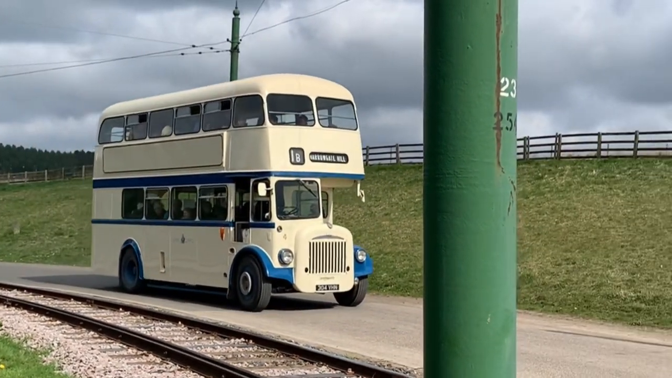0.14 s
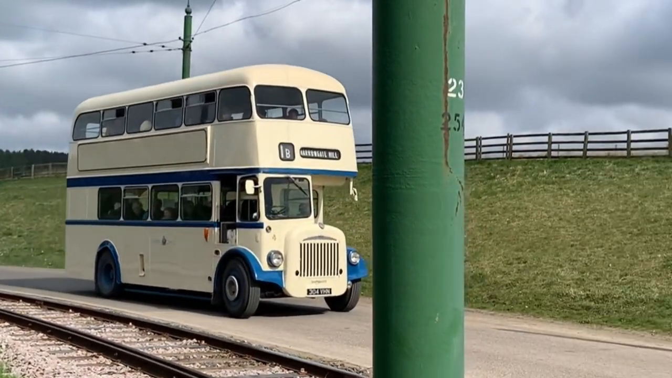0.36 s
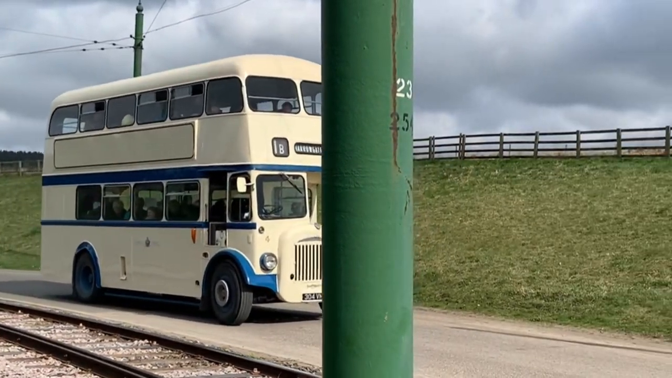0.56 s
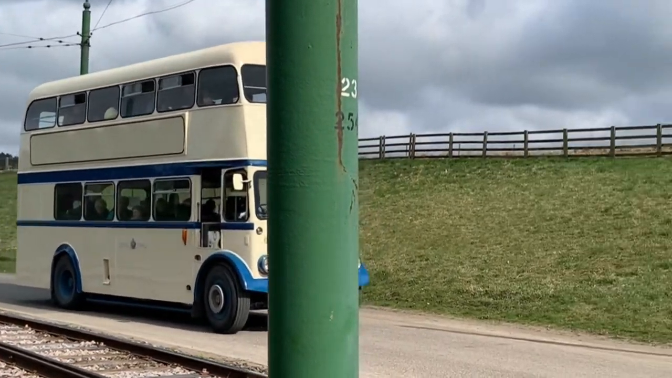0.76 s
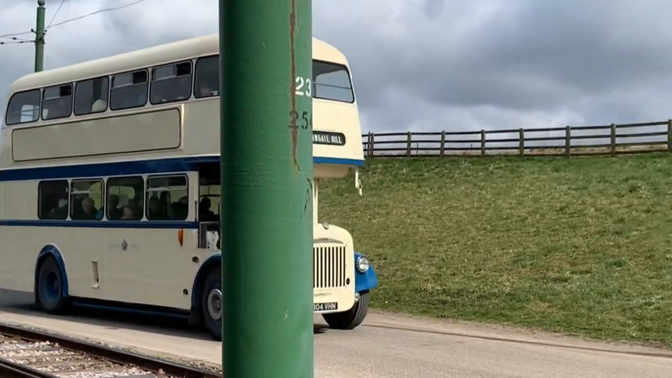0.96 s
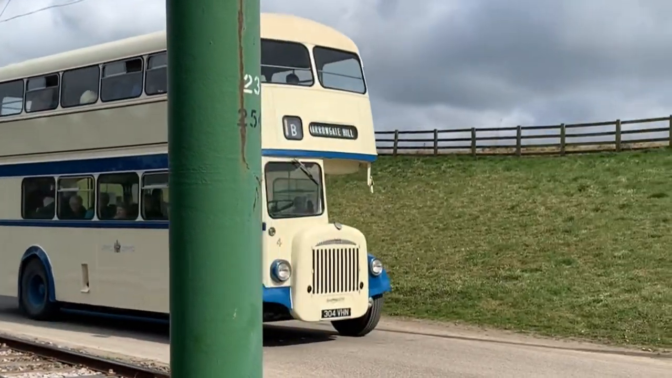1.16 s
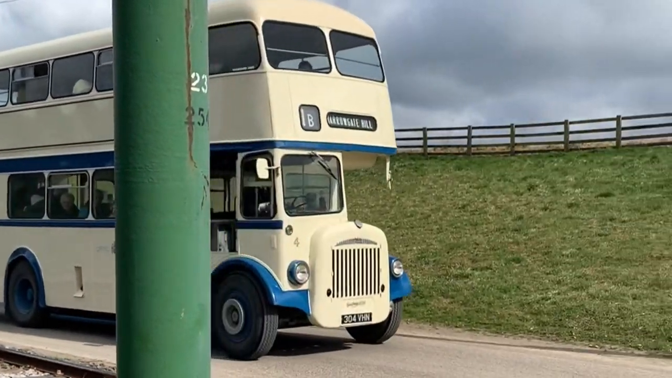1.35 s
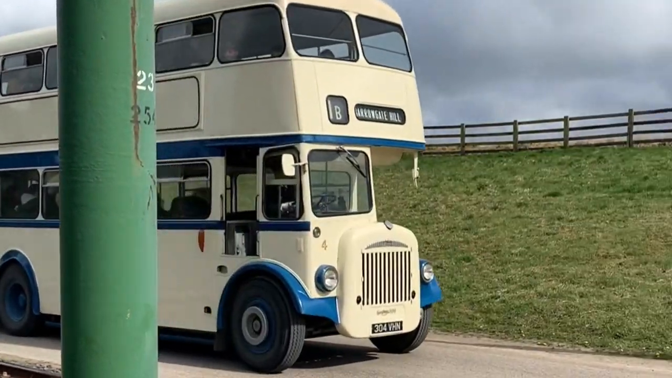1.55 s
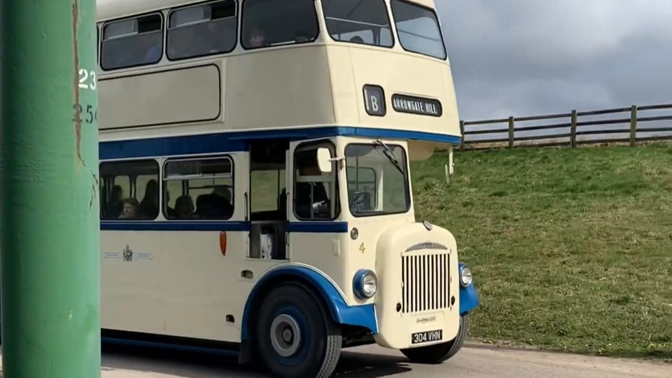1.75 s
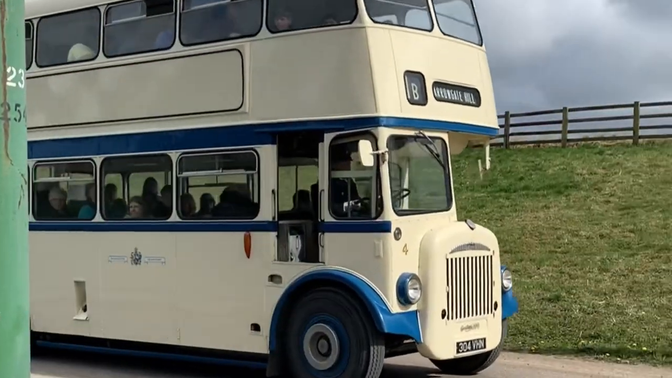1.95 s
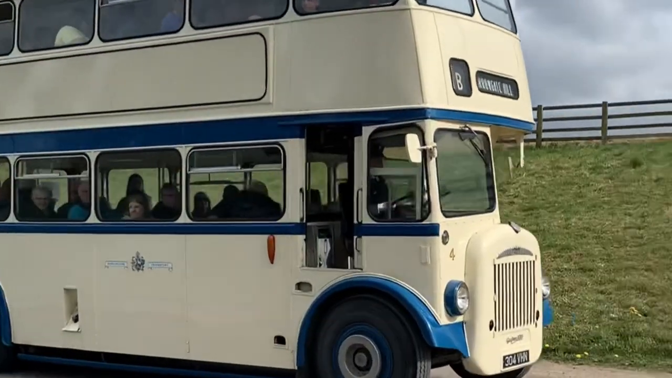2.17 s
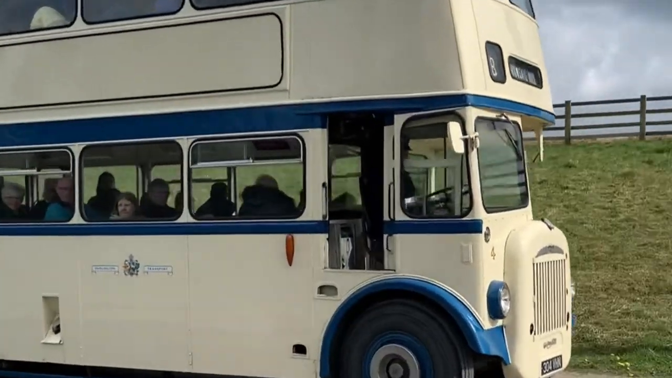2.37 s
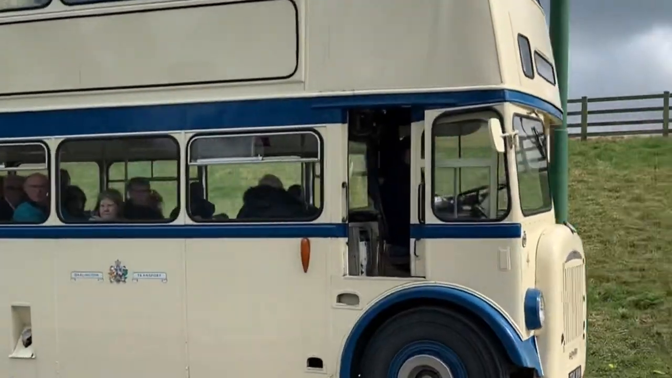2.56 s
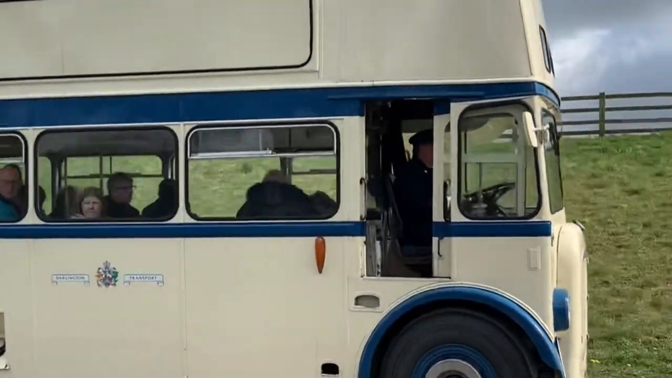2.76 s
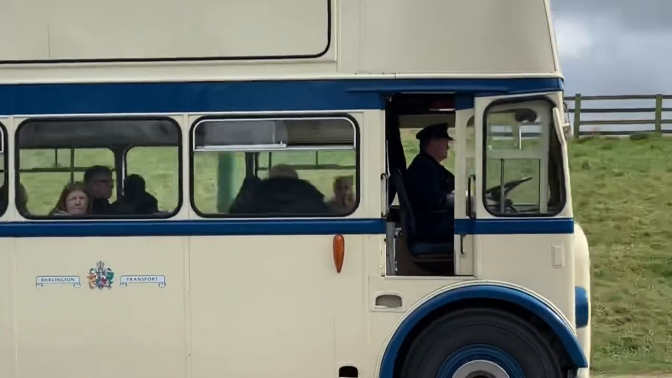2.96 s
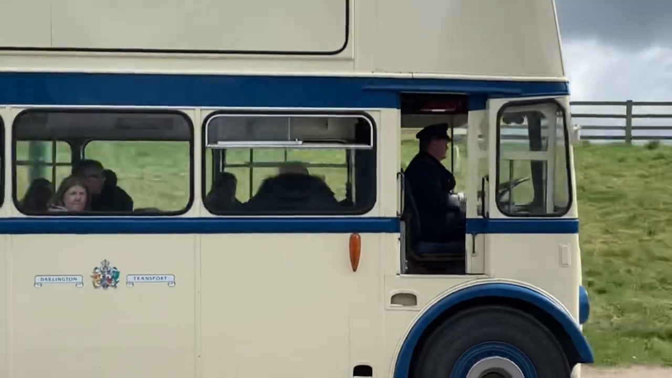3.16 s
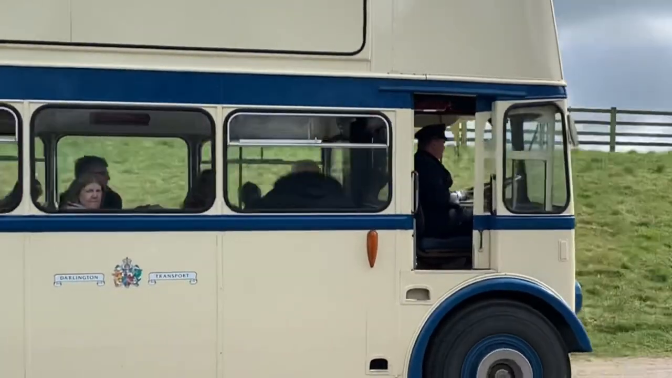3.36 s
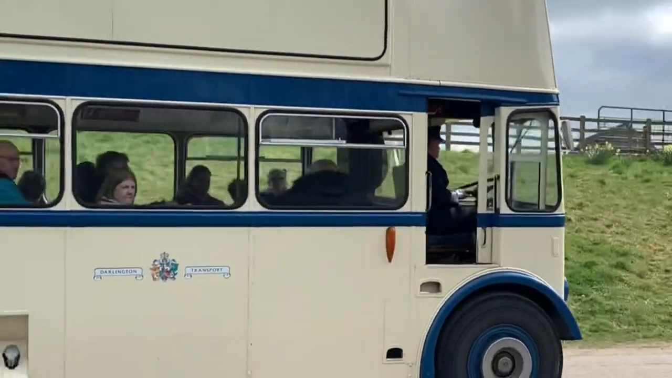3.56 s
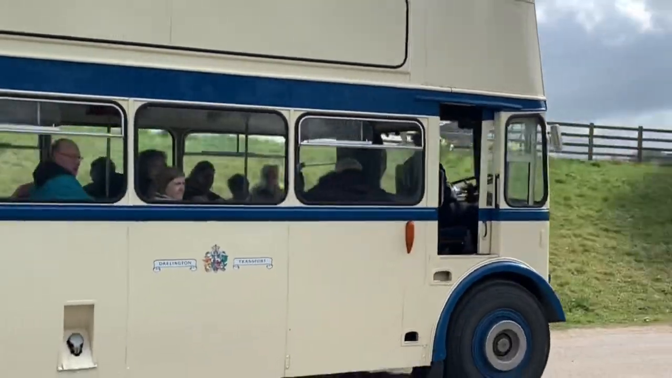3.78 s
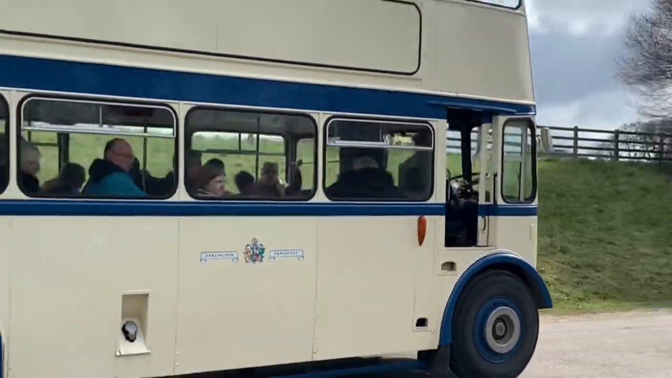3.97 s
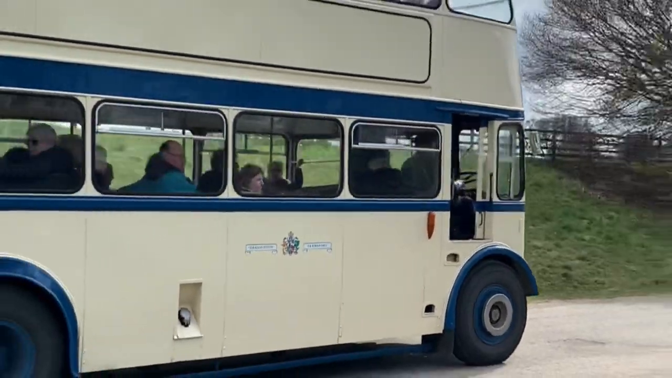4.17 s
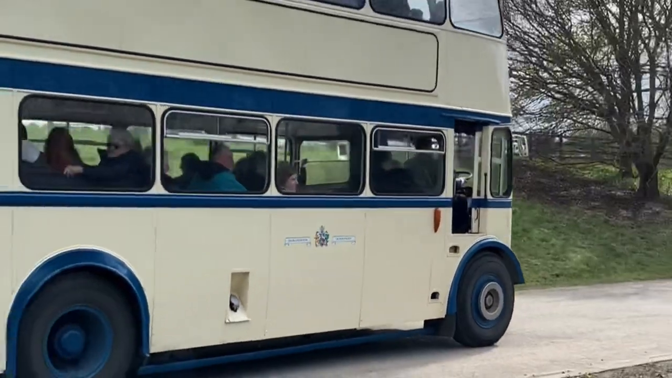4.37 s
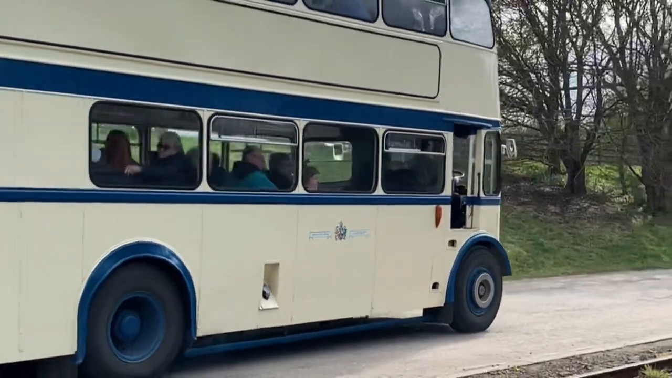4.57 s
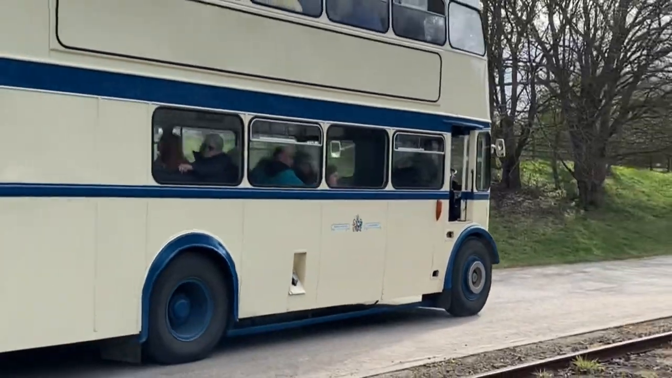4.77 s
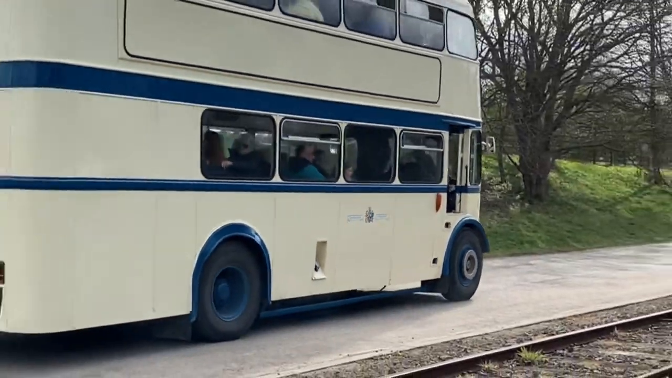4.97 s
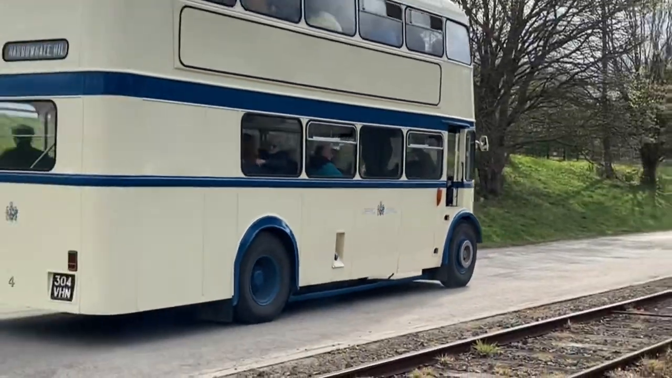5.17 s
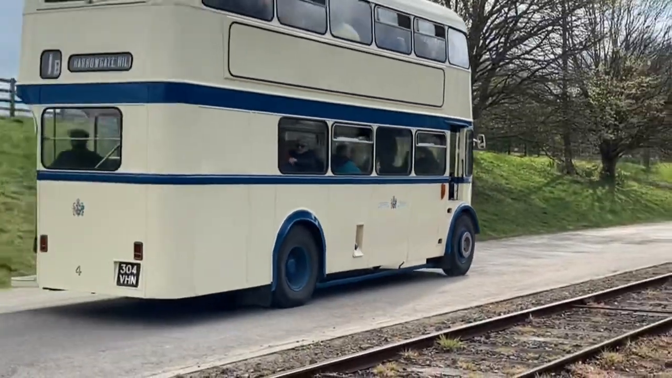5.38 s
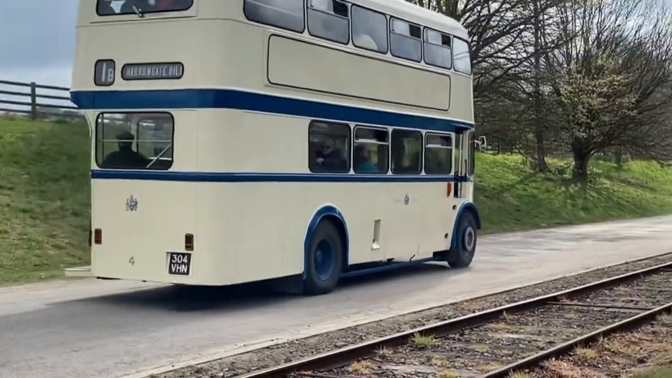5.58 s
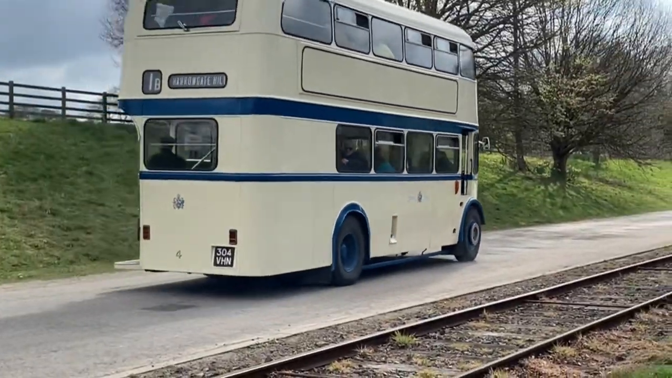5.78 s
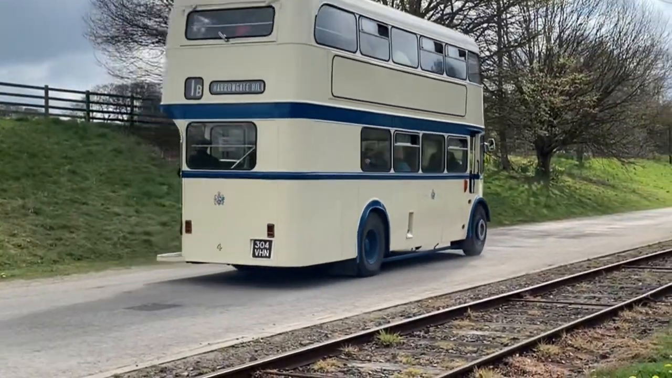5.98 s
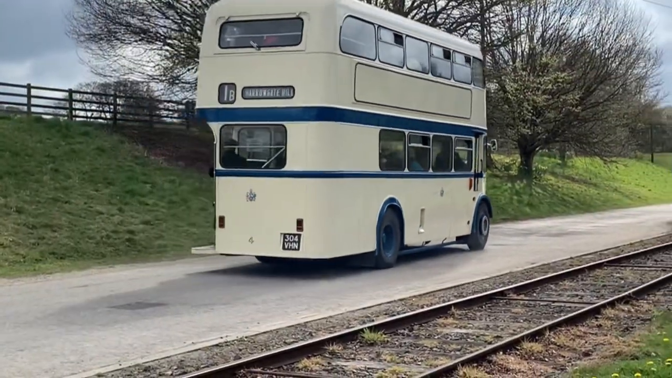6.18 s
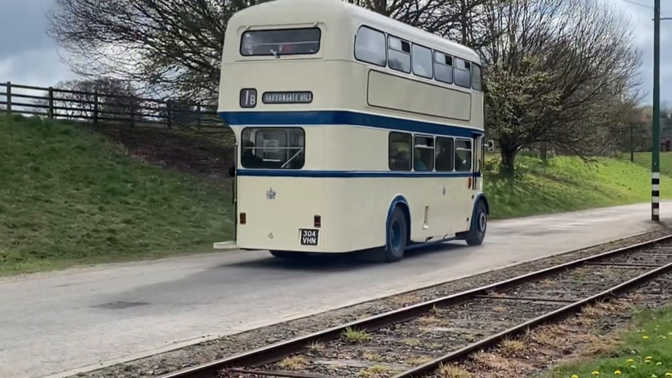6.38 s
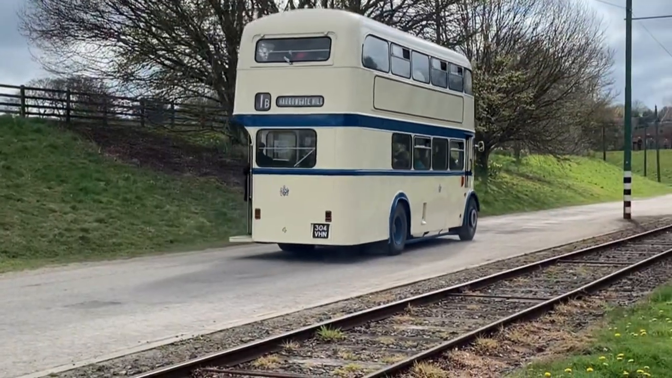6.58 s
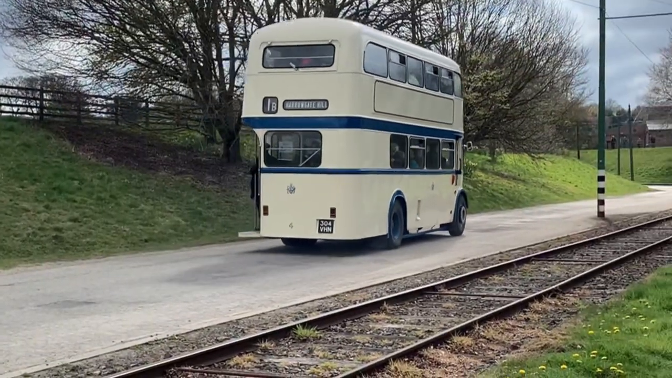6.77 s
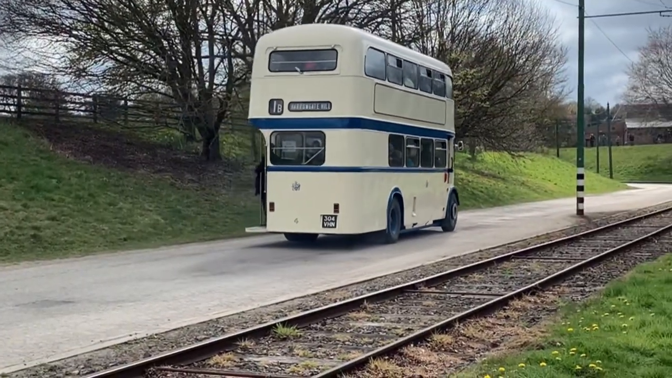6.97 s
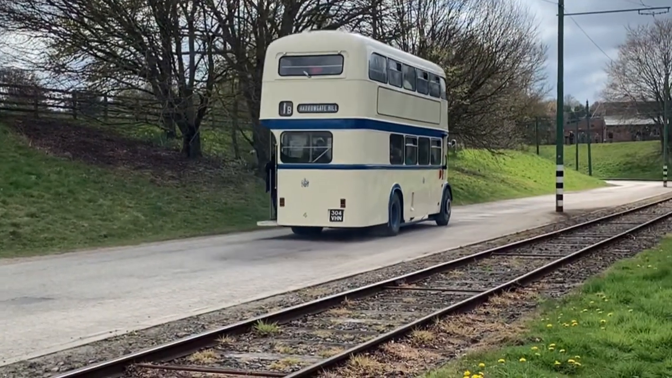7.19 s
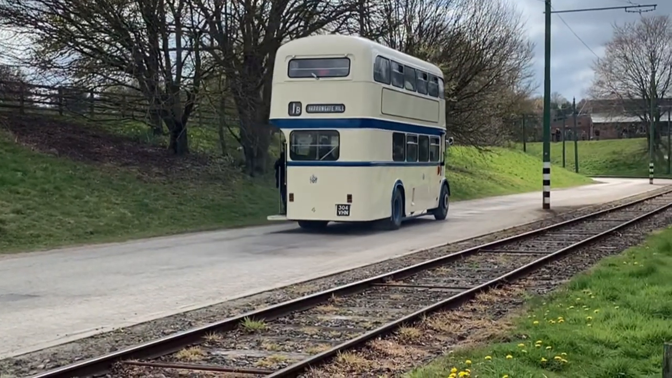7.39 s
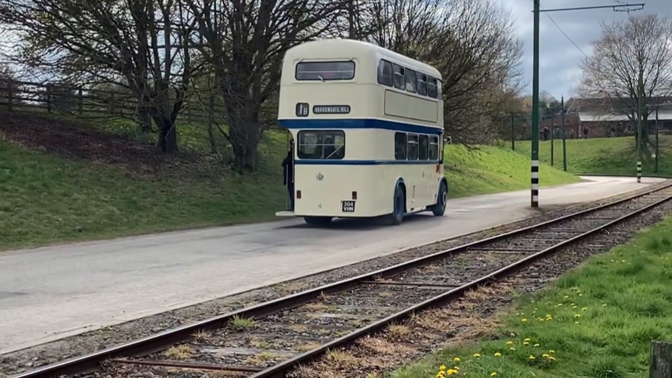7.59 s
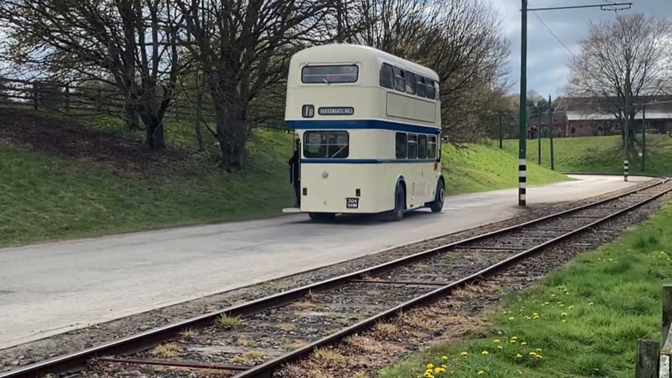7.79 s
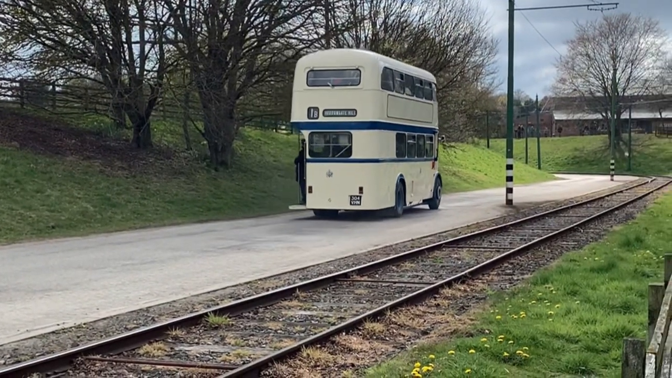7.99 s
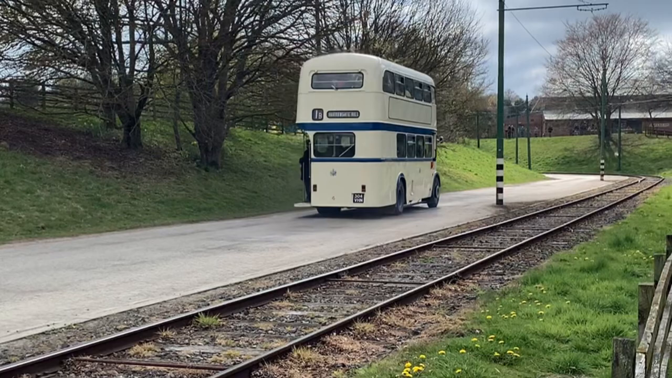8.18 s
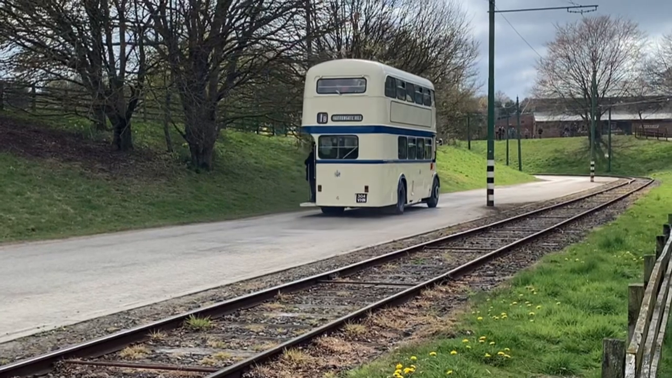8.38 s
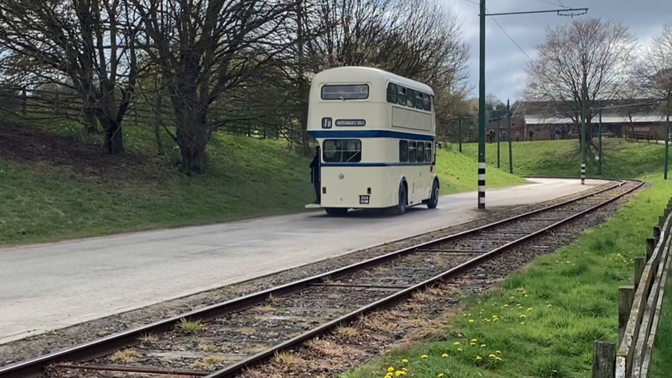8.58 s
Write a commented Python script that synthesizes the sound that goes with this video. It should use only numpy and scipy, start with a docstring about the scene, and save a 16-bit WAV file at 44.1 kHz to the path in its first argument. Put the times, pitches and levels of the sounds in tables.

```python
"""An old five-cylinder diesel bus hums and clatters past, then draws away down a country road.
Each firing puffs down the exhaust pipe and rattles the engine block. The valves tick, one cylinder
hisses louder than the rest, and thin whines waver on top. Gusts thump and pop on the microphone."""
import sys
import numpy as np
from scipy.fft import rfft, irfft, next_fast_len
from scipy.io import wavfile
from scipy.ndimage import uniform_filter1d, map_coordinates

SR = 44100
rng = np.random.default_rng(int(sys.argv[2]) if len(sys.argv) > 2 else 0)


def unload_wav(signal):
    """Save mono or channel-first audio to the path in sys.argv[1] as 16-bit WAV at rate SR, clipped to [-1, 1]."""
    wavfile.write(
        sys.argv[1],
        SR,
        np.round(np.clip(np.atleast_2d(signal).T, -1, 1) * 32767).astype(np.int16),
    )


N = 381024
TIME = np.arange(N) / SR

CYCLES_PER_S = 9.0585  # one cycle is two shaft turns and five firings
# Four "passing numbers" set how loud a part is: dB when level with the listener, dB lost each time
# the distance doubles, extra dB ahead of the bus, metres behind the engine.
BLOCK_PASS, KNOCK_PASS = (-26.5, 5, 6, 7), (-43.5, 5, 4.5, 3.5)
GEAR_PASS, HISS_PASS = (-48, 6.5, 7.5, 7), (-45.5, 10, 7.5, 5.5)
def bus():
    """One crank times the engine. Its sound arrives later the further away the bus is."""
    _, distance = passing()
    cycle = CYCLES_PER_S * (TIME - distance / SOUND_M_S) - 0.213
    surge = np.clip(np.minimum(TIME - 2.054, (2.44 - TIME) / 2) / 0.08 + .5, 0, 1)  # the clatter swells
    block_db = heard(*BLOCK_PASS) + 1.5 * surge
    engine = exhaust(cycle, block_db) + block(cycle, block_db)
    engine += knock(cycle, heard(*KNOCK_PASS) + 6.5 * surge)
    engine += valves(cycle - .035, heard(*GEAR_PASS) + 4.5 * surge, heard(*HISS_PASS))
    return engine + tappet(cycle) + whines()

# The exhaust's hum. Each row: pitch as a multiple of the cycle rate, then the four passing numbers.
HUM_TONES = [(5.07, -22.5, 12.6, 1.5, -0.5), (8.05, -31, 7.3, -2.5, 14.5), (9.98, -23, 6, 4, 6.5),
             (19.9, -30, 23.3, -2, 5), (4.03, -38, 3.9, 3, -2), (13.91, -37.5, 6.9, -6.5, 15),
             (16.02, -38.5, 6.8, 2.5, 10.5), (29.97, -38.5, 7.2, 3, 6)]
# Two sounds that swell and sink. Each row: time in seconds, overtone in dB, silencer drone in dB.
EXHAUST_SWELLS = [(0, -29, -56), (1.1, -26.5, -36.5), (1.7, -27.5, -32.5), (2.05, -33.5, -31.5),
                  (2.3, -51, -66), (2.8, -39, -34), (3.4, -30.5, -34.5), (4.25, -27.5, -27.5),
                  (4.9, -80, -39.5), (6, -42, -38.5), (7, -45, -41), (7.85, -55, -54), (8.64, -49, -41.5)]
# How strongly each of the five cylinders puffs, as a plain multiplier.
PUFF_STRENGTHS = [1.9, 1, 1.25, 0.36, 0.26]
# The pipe's tone colour. Each row: frequency in Hz, level in dB.
PIPE_COLOUR = [(25, -46), (45, -12), (75, -4), (130, -4), (180, -5), (230, -15.5), (280, -11), (380, -14.5),
               (600, -71)]
# Tones the silencer favours. Each row: multiple of the cycle rate, level in dB.
SILENCER_TONES = [(35.3, 1.5), (36.1, 2.5), (71.7, -12)]
def exhaust(cycle, puff_db):
    """Uneven firings puff down the pipe, over a low hum and the drone of the silencer."""
    overtone_db, drone_db = curves(EXHAUST_SWELLS)
    hum = sum(amp(heard(*law)) * engine_tone(cycle, k, drift=0.052) for k, *law in HUM_TONES)
    hum += amp(overtone_db) * engine_tone(cycle, 15, drift=0.013)  # three times the firing rate
    pulses = np.gradient(bursts(cycle, 20 * np.log10(PUFF_STRENGTHS), scatter_db=9.5, fade=0.098))
    puffs = coloured(pulses, PIPE_COLOUR) + 1.74 * coloured(rng.standard_normal(N), PIPE_COLOUR)
    drone = sum(amp(db) * engine_tone(cycle, k, drift=0.28) for k, db in SILENCER_TONES)
    return hum + amp(puff_db) * unit(puffs) + amp(drone_db) * unit(drone)

# The block's tone colour from the front, side and back. Each row: frequency in Hz, level in dB.
FRONT_COLOUR = [(220, -38), (380, -5.5), (452, -7), (505, -1.5), (649, 1), (754, -5), (971, -3),
                (1570, -9.5), (1900, -8), (2500, -25), (3250, -46), (5500, -120)]
SIDE_COLOUR = [(220, -44), (380, -13), (639, 5.5), (876, 0), (948, -0.5), (1290, -5), (1440, -5.5),
               (1690, -15.5), (1910, -8), (2500, -30.5), (3250, -52), (5500, -120)]
BACK_COLOUR = [(220, -5.5), (380, -4.5), (424, -9.5), (501, 1.5), (639, -3.5), (760, -4.5), (836, -10.5),
               (904, -7), (1090, -2.5), (1550, -13), (1700, -7.5), (2500, -19), (3250, -60), (5500, -120)]
# How the bonnet panels and the underside ring. Each row: pitch in Hz, width in Hz, level in dB.
PANEL_RINGS = [(615, 153, -5.5), (960, 28, -5), (1422, 36, -1.5), (1856, 45, -3.5)]
UNDERSIDE_RINGS = [(498.7, 10, 7), (635.3, 22, 7), (928, 3, -5), (1045, 18, 3.5), (1128, 9.2, 1)]
def block(cycle, level_db):
    """Combustion rattles the block. Its colour changes as we hear the front, side, then back."""
    road, _ = passing(behind_m=1.34)
    facing = 1 + np.tanh(road / 14)  # 0 front, 1 side, 2 back
    front, side, back = (np.clip(1 - abs(facing - k), 0, 1) ** .5 for k in range(3))
    shakes = bursts(cycle, [0, -.6, -2.5, -1.2, .4], scatter_db=1.5, fade=.9)
    blows = bursts(cycle, [1, -1, -4, -2, 1.5], scatter_db=2.5, fade=.5)
    views = (front, FRONT_COLOUR), (side, SIDE_COLOUR), (back, BACK_COLOUR)
    rattle = sum(share * pulsing_noise(shakes, colour, steady=0.96) for share, colour in views)
    panels = (0.47 + side) * ringing(blows * rng.standard_normal(N), PANEL_RINGS)
    underside = back * ringing(blows * rng.standard_normal(N), UNDERSIDE_RINGS)
    return amp(level_db + 0.23 * wobble(11)) * (rattle + 0.33 * panels + 0.5 * underside)

# The knock's tone colour. Each row: frequency in Hz, level in dB.
KNOCK_COLOUR = [(1700, -16.5), (2300, 1.5), (2800, 3), (3050, 1), (3250, 3), (3450, -3), (4000, 1),
                (4600, -62), (5500, -85)]
def knock(cycle, level_db):
    """The bright edge of the combustion clatter, hardest at one cylinder."""
    blows = bursts(cycle, [2, -4.5, -7.5, -9, -7.5], scatter_db=2.8, fade=1.0)
    clatter = pulsing_noise(blows, KNOCK_COLOUR, steady=2.5)
    return amp(level_db + 1.6 * wobble(13)) * clatter

# How much hiss each of the five cylinders lets out as it fires, in dB.
LEAK_DB = [-0.5, -5.5, -12, -13, -9.5]
# Tone colours of the valve gear and the gas. Each row: frequency in Hz, level in dB.
GEAR_COLOUR = [(3600, -30), (4300, -3), (5200, -3), (6000, -2), (6500, -1), (6800, 1), (7150, -5),
               (7800, -8), (9000, -30)]
HISS_COLOUR = [(7000, -15.5), (8200, -1), (9200, 1), (10200, 3), (11200, -1), (13000, -5), (14500, -1),
               (16500, -7)]
def valves(cycle, gear_db, hiss_db):
    """Valve gear ticks and gas hisses once a firing, turning dull and even as the bus leaves."""
    gone_m = np.maximum(passing()[0], 0)
    blur = .022 * gone_m
    taps = bursts(cycle, 0.81 * np.asarray(LEAK_DB), scatter_db=1.5, fade=1.2)
    gear = pulsing_noise(taps, GEAR_COLOUR, steady=1 + blur) / (1 + .5 * blur)
    leaks = bursts(cycle, LEAK_DB, scatter_db=1.5, fade=1.2)
    hiss = pulsing_noise(leaks, HISS_COLOUR, steady=0.42 + blur) / (1 + blur)
    treble = filtered(hiss, lambda hz: np.clip((hz - 9500) / 2500, 0, 1))
    hiss += (amp(-.1 * gone_m) - 1) * treble  # air soaks up the highest treble
    drift_db = 0.61 * wobble(4.8)
    return amp(gear_db + 0.38 * drift_db) * gear + amp(hiss_db + drift_db) * hiss

def tappet(cycle):
    """A tappet, the part that pushes a valve, pings once a cycle, never quite the same."""
    count, age = np.floor(cycle).astype(int) + 2, cycle % 1
    level_luck, pitch_luck = rng.standard_normal((count[-1] + 1, 2))[count].T
    hz = 5900 * doppler() + 60 * pitch_luck + 130 * wobble(270)
    attack = (1 - np.exp(-60 * age)) ** 2
    return amp(heard(-51, 15, -4, 30) + 4 * level_luck - 190 * age) * attack * sine(hz)

# Thin whines, perhaps gears. Each row: pitch in Hz, flutter in Hz, then the four passing numbers.
THIN_WHINES = [(947, 6.6, -34, 11.2, 2.8, 3.2), (3130, 13.7, -64, 4.2, 0.5, 23)]
# A rough metallic squeal. Each row: time in seconds, pitch in Hz, level in dB.
SQUEAL_PATH = [(0, 3260, -55), (1.1, 3120, -67), (1.75, 3340, -46), (1.95, 3245, -66), (2.28, 3255, -36.5),
               (2.45, 3220, -56), (2.75, 3310, -60), (3.0, 3140, -51), (3.17, 3246, -45.5),
               (3.6, 3070, -45.5), (3.9, 3110, -53.5), (4.05, 3090, -49), (4.5, 3080, -48.5),
               (5.1, 3075, -52), (5.35, 3000, -63.5), (6.0, 3104, -55.5), (7, 3050, -66),
               (8.64, 3130, -64.5)]
def whines():
    """Two whines and a wandering squeal flutter in pitch and strength."""
    voices = [(hz * doppler(), flutter_hz, heard(*law)) for hz, flutter_hz, *law in THIN_WHINES]
    lowest_db = voices[0][2]
    lowest_db += 8.3 * bump(3.53, .07)  # the lowest whine sings out once
    squeal_hz, squeal_db = curves(SQUEAL_PATH)
    out = np.zeros(N)
    for hz, flutter_hz, db in voices + [(squeal_hz, 36, squeal_db)]:
        flutter_db = 2.5 * wobble(45) + wobble(4)
        out += amp(db + flutter_db) * sine(hz + flutter_hz * wobble(90))
    return out

# How hard the wind blows. Each row: time in seconds, level in dB.
GUST_LEVELS = [(0, -35.5), (1.37, -35), (1.5, -27), (2.9, -26), (3.05, -22.5), (3.25, -22), (4.4, -28.5),
               (4.9, -26), (5.2, -33), (6.7, -32.5), (6.87, -30), (7.45, -36.5), (7.92, -43), (8.0, -33),
               (8.15, -29.5), (8.21, -41), (8.27, -26.5), (8.35, -35.5), (8.42, -42), (8.64, -41)]
# The wind's tone colour. Each row: frequency in Hz, level in dB.
GUST_COLOUR = [(20, -48), (40, -9.5), (70, 5), (150, -3.5), (300, -9), (600, -38.5), (1200, -79)]
def gusts():
    """Wind buffets the microphone in lumps. Both sides share the deepest rumble."""
    lumps = (rng.standard_normal(N) * amp(2.36 * wobble(16)) for _ in range(3))
    shared, *sides = (coloured(lump, GUST_COLOUR) for lump in lumps)
    apart = filtered(np.array(sides), lambda hz: np.minimum(hz / 450, 1))
    return amp(curves(GUST_LEVELS)[0]) * (shared + 1.08 * apart)

# Pops of wind. Each row: start in seconds, level in dB, pitch drop in Hz, length in seconds.
WIND_POPS = [(1.574, -13, 111, 0.019), (1.719, -14.5, 243, 0.023), (1.795, -19, 120, 0.025),
             (1.818, -16.5, 60, 0.046), (1.861, -16, 150, 0.018), (2.013, -18, 110, 0.035),
             (2.058, -19, 120, 0.021), (2.099, -10, 110, 0.016), (2.565, -14.5, 270, 0.017),
             (2.824, -16, 79.4, 0.05), (3.04, -11.5, 59.8, 0.037), (3.148, -10, 130, 0.017),
             (3.285, -15, 149, 0.0087), (1.961, -16, 414, 0.021), (2.324, -16, 420, 0.018),
             (2.41, -14.5, 493, 0.0081), (2.947, -11.5, 289, 0.026), (4.868, -15.5, 408, 0.019),
             (6.821, -17.5, 238, 0.059), (7.255, -11, 496, 0.02), (7.278, -20, 516, 0.0076),
             (7.285, -10, 296, 0.041), (7.444, -24, 250, 0.02), (7.983, -19.5, 154, 0.094),
             (7.997, -26.5, 462, 0.0098), (8.057, -7.5, 364, 0.01), (8.069, -10, 150, 0.011),
             (8.073, -13, 100, 0.021), (8.156, -16.5, 201, 0.021), (8.256, -18.5, 59, 0.09)]
def wind_pops():
    """Each pop is a short thump that falls quickly in pitch."""
    out, t = np.zeros((2, N + SR)), np.arange(SR // 5) / SR
    skew = np.array([[1], [-1]]) * np.exp(-t / 0.028)  # a pop reaches one side first
    for start, db, drop_hz, length in WIND_POPS:
        hz = (62 + drop_hz / (1 + (t / 0.0047) ** 2.36)) * amp(0.9 * wobble(112)[:len(t)])
        tone = np.sin(2 * np.pi * (np.cumsum(hz) / SR + 0.064 * skew))
        swell = (1 - np.exp(-t / 0.0011)) ** 2 * np.exp(-(t / length) ** 3)
        ragged_db = (2 * wobble(120) + 1.5 * np.array([wobble(120), wobble(120)]))[:, :len(t)]
        out[:, round(start * SR):][:, :len(t)] += amp(db - 0.49 * skew + ragged_db) * swell * tone
    return out[:, :N]

# Stray clicks. Each row: start in seconds, level in dB, pitch in Hz, seconds to fade by 60 dB.
SMALL_TICKS = [(.374, -36, 12400, 0.0045), (1.596, -18, 1310, 0.034), (3.481, -21, 10300, 0.013),
               (4.498, -36, 5630, 0.02), (5.833, -26.5, 2730, 0.0095), (8.565, -47, 6270, .03),
               (8.569, -35, 1870, 0.051)]
def ticks():
    """Each tick is a quickly dying tone roughened by noise."""
    out, t = np.zeros(N + SR), np.arange(SR // 10) / SR
    for start, db, hz, fade_s in SMALL_TICKS:
        grit = 1 + 0.57 * unit(uniform_filter1d(rng.standard_normal(len(t)), size=24))
        out[round(start * SR):][:len(t)] += amp(db - 60 * t / fade_s) * np.sin(2 * np.pi * hz * t) * grit
    return out[:N]

# Brief dips in level. Each row: middle in seconds, depth in dB, half width in seconds.
LEVEL_DIPS = [(7.78, 5, 0.34), (8.18, 15, 0.076), (8.5, 4.5, 0.25)]
def dipped(x):
    """The sound between 150 and 900 Hz sinks during the last gusts."""
    band = filtered(x, lambda hz: (hz > 150) & (hz < 900))
    depth_db = sum(db * bump(middle, half) for middle, db, half in LEVEL_DIPS)
    return x + (amp(-depth_db) - 1) * band

def stirred(x):
    """A copy with stirred phases, used to make left and right less alike and the sound wider."""
    shifts = np.cumsum(rng.standard_normal(SR // 8))
    return filtered(x, lambda hz: np.exp(1j * np.interp(hz / 8, np.arange(len(shifts)), shifts)))

# How much louder the left side is. Each row: frequency in Hz, left minus right in dB.
LEFT_LOUDER = [(60, 0), (330, .5), (500, -5.5), (770, -2.5), (1200, -1.5), (1800, -.5), (2700, -2.5),
               (4000, 0)]
# How far the left wave runs ahead. Each row: frequency in Hz, lead in radians.
LEFT_LEAD = [(0, 0), (430, -.6), (860, -.7), (1380, -.1), (2350, 0), (17000, 20.9)]
# How alike the two sides are. Each row: frequency in Hz, likeness from 0 to 1.
LIKENESS = [(60, .995), (150, .98), (300, .95), (430, .7), (600, .95), (1200, .96), (1700, .97),
            (2400, .93), (3000, .85), (4300, .82)]
def stereo(x):
    """Left and right differ slightly in level, timing and likeness, depending on frequency."""
    side = np.array([[.5], [-.5]])
    lead = lambda hz: np.exp(1j * side * np.interp(hz, *np.transpose(LEFT_LEAD)))
    pair = lambda hz: amp(side * along(LEFT_LOUDER, hz)) * lead(hz)
    spread = lambda hz: np.arccos(along(LIKENESS, hz)) / 2
    shared = filtered(x, lambda hz: pair(hz) * np.cos(spread(hz)))
    return shared + filtered(stirred(x), lambda hz: 2 * side * pair(hz) * np.sin(spread(hz)))

def background():
    """A faint, steady, low rush."""
    colour = [(60, 0), (1000, -14), (5000, -44), (9000, -60), (16000, -76)]  # Hz, dB
    return amp(-64) * coloured(rng.standard_normal((2, N)), colour)

SPEED_M_S, NEAREST_M, NEAREST_AT_S, SOUND_M_S = 9.9, 10.22, 3.461, 343
def passing(behind_m=0):
    """Metres along the road past the listener, and metres away in a straight line."""
    road = SPEED_M_S * (TIME - NEAREST_AT_S) - behind_m
    return road, np.hypot(NEAREST_M, road)

def heard(beside_db, doubling_db, ahead_db, behind_m):
    """Level in dB of a part of the bus as it passes."""
    road, distance = passing(behind_m)
    return beside_db - doubling_db * np.log2(distance / NEAREST_M) - ahead_db * road / distance

def doppler():
    """Pitch multiplier: higher coming, lower going."""
    road, distance = passing()
    return 1 - SPEED_M_S / SOUND_M_S * road / distance

def engine_tone(cycle, multiple, drift):
    """A tone at a multiple of the cycle rate that flutters more as the bus leaves."""
    flutter_db = (.8 + .07 * np.maximum(passing()[0], 0)) * wobble(14)
    turns = multiple * cycle + drift * wobble(6) + rng.random()
    return np.sqrt(2) * amp(flutter_db) * np.sin(2 * np.pi * turns)

def bursts(cycle, cylinder_db, scatter_db, fade):
    """A dying burst at each firing; fade is counted in gaps between firings."""
    firing = 5 * (cycle - np.floor(cycle[0]))
    k = firing.astype(int)
    size = amp(np.asarray(cylinder_db)[k % 5] + scatter_db * rng.standard_normal(k[-1] + 1)[k])
    return uniform_filter1d(size * np.exp(-(firing - k) / fade), size=260)

def pulsing_noise(pulses, colour, steady):
    """Noise, part steady and part let through in bursts."""
    return coloured(rng.standard_normal(N) * (steady + unit(pulses)), colour)

def ringing(x, rings):
    """x rings at the given pitches, with the treble cut."""
    peaks = lambda f: sum(amp(db) * 1j * f * w / (hz * hz - f * f + 1j * f * w) for hz, w, db in rings)
    return unit(filtered(x, lambda f: peaks(f) / (1 + (f / 2100) ** 8)))

def coloured(x, colour):
    """Give x a tone colour, with nothing above its last row, at strength 1."""
    return unit(filtered(x, lambda hz: amp(along(colour, hz)) * (hz < colour[-1][0])))

def filtered(x, response):
    """Multiply each frequency in x by response(hz)."""
    size = next_fast_len(N + SR // 2)
    return irfft(rfft(x, size) * response(np.fft.rfftfreq(size, 1 / SR)), size)[..., :N]

def along(rows, hz):
    """Read between rows of (Hz, value) on a log frequency scale."""
    row_hz, values = np.transpose(rows)
    return np.interp(np.log(hz + 1), np.log(row_hz + 1), values)

def curves(rows):
    """One value per sample for each column after the time."""
    seconds, *columns = np.transpose(rows)
    return [np.interp(TIME, seconds, column) for column in columns]

def wobble(rate):
    """A smooth curve through rate random points a second."""
    return map_coordinates(rng.standard_normal(int(N * rate / SR) + 4), [TIME * rate])

def bump(middle_s, half_width_s):
    """A smooth rise to 1 and back."""
    return np.exp(-((TIME - middle_s) / half_width_s) ** 2)

def sine(hz):
    """A tone that follows a changing pitch."""
    return np.sin(2 * np.pi * np.cumsum(hz) / SR)

def amp(db):
    """Turn dB into a multiplier."""
    return 10 ** (np.asarray(db) / 20)

def unit(x):
    """Scale x to an average strength (rms) of 1."""
    return x / np.sqrt(np.mean(x ** 2) + 1e-20)

def scene():
    """The bus, spread to left and right, with the wind on top."""
    return stereo(dipped(bus() + ticks())) + gusts() + wind_pops() + background()

def record(dry):
    """Cut off the very highest treble."""
    return filtered(dry, lambda hz: hz < 15870)

dry = scene()
out = record(dry)
unload_wav(out)
```